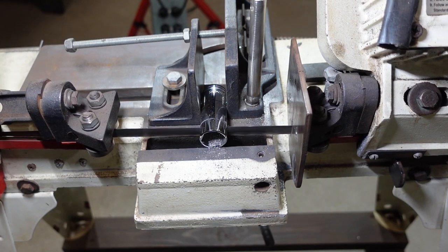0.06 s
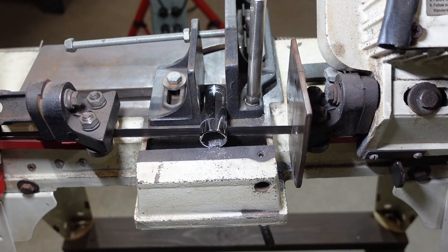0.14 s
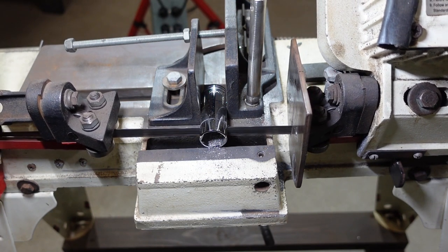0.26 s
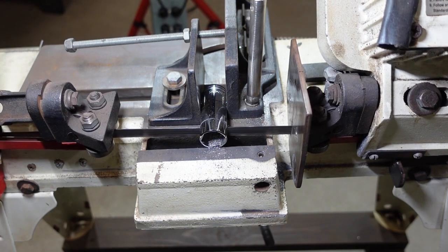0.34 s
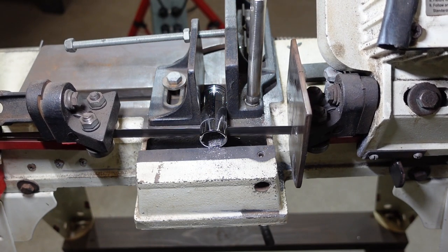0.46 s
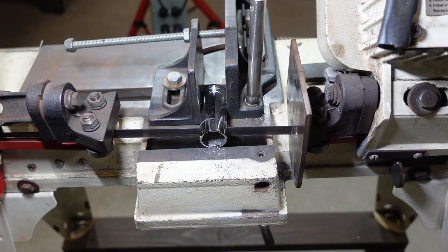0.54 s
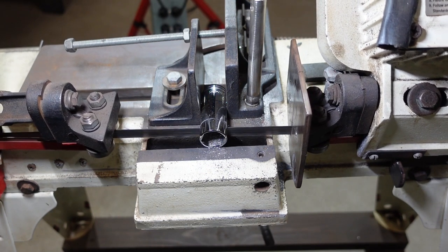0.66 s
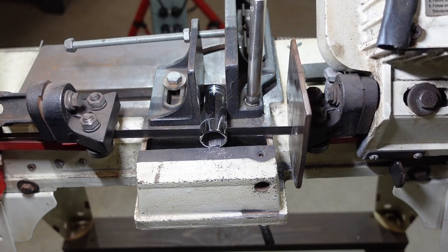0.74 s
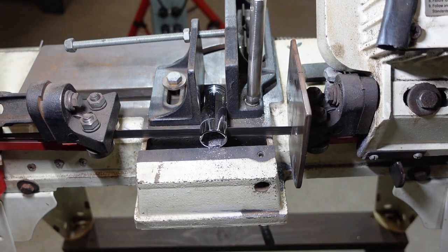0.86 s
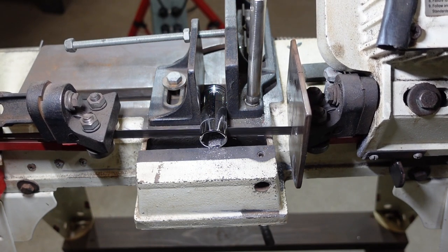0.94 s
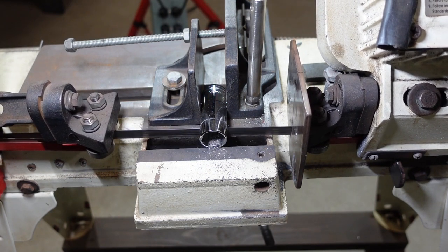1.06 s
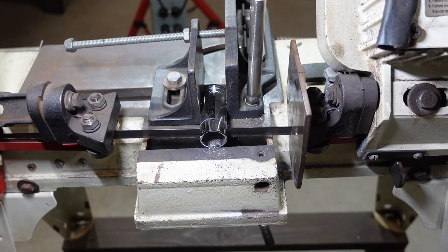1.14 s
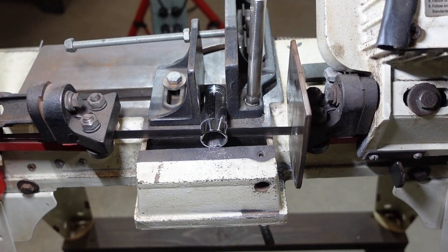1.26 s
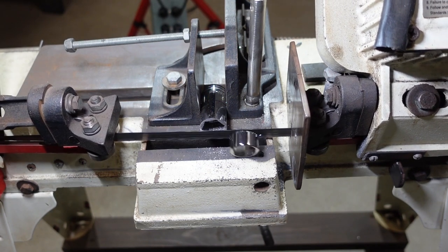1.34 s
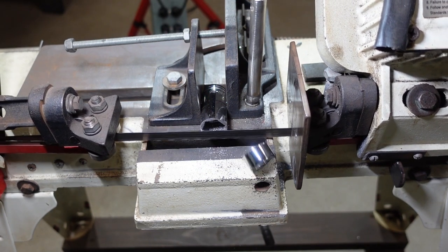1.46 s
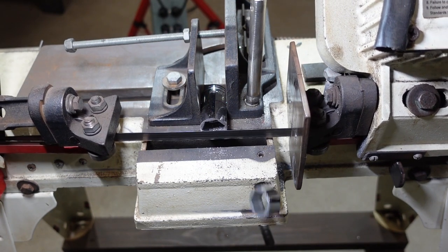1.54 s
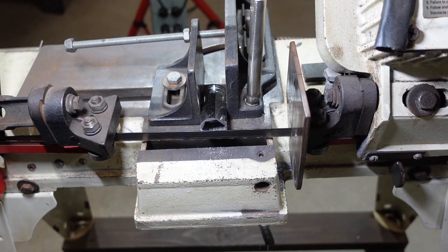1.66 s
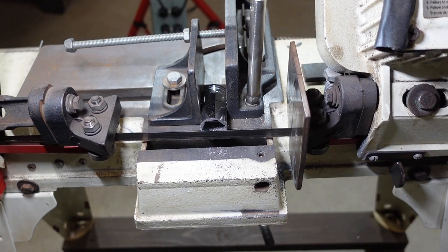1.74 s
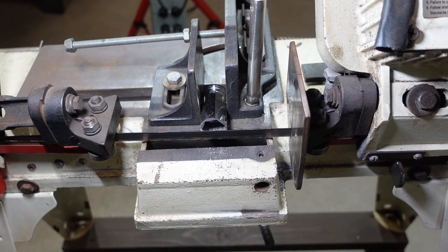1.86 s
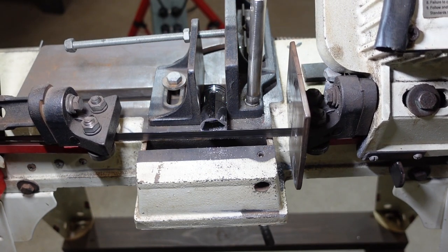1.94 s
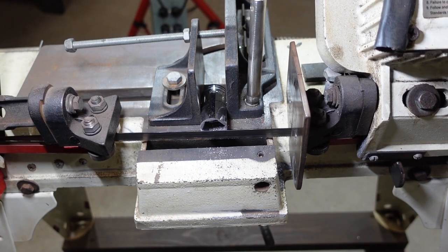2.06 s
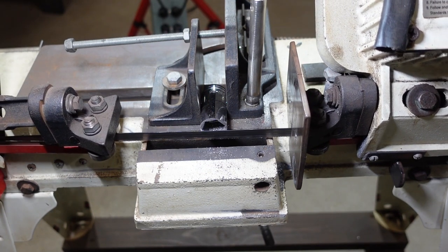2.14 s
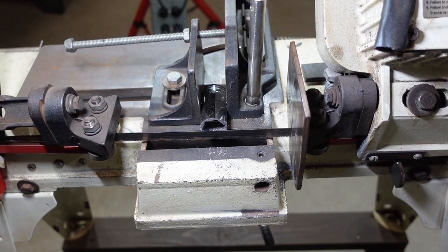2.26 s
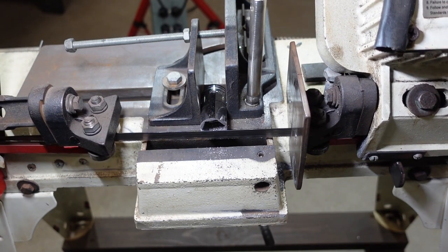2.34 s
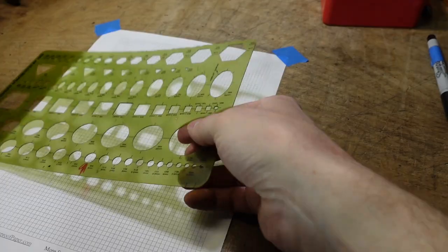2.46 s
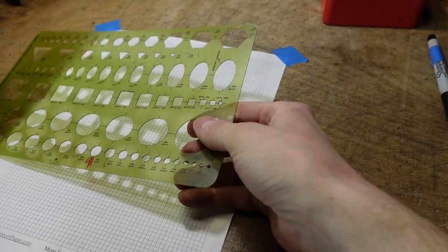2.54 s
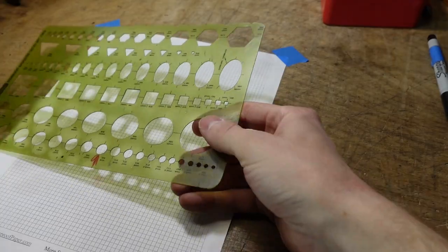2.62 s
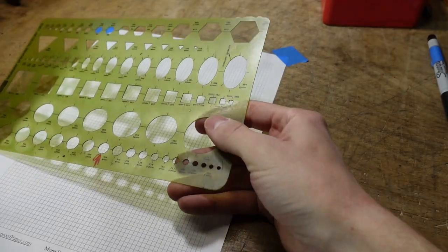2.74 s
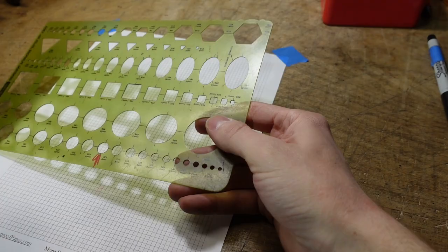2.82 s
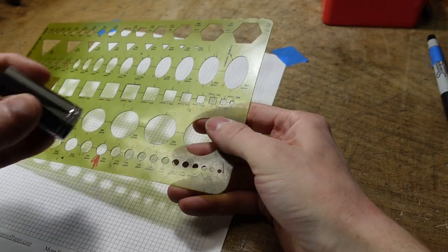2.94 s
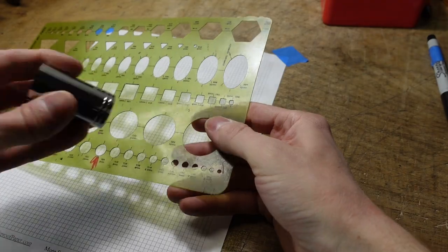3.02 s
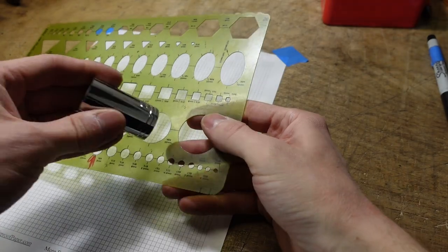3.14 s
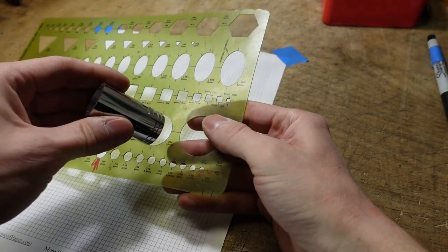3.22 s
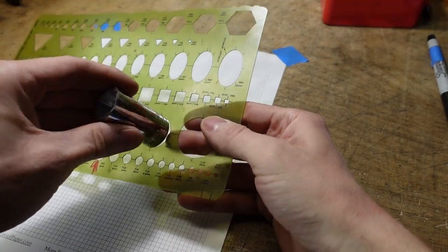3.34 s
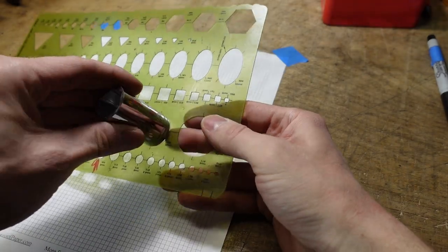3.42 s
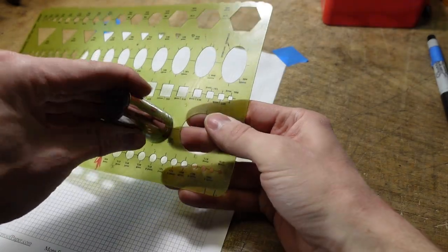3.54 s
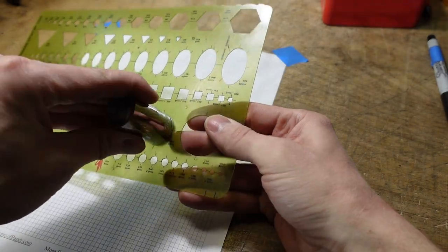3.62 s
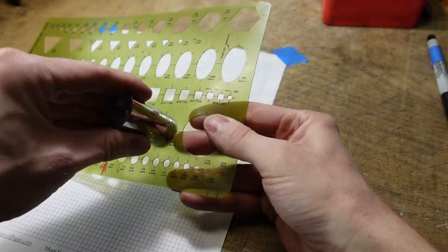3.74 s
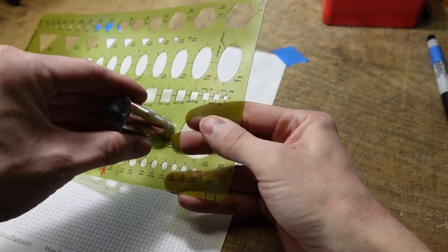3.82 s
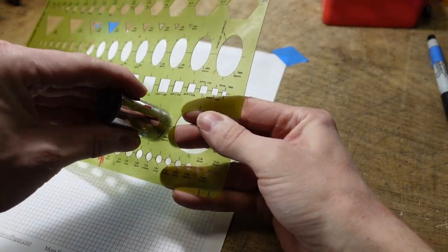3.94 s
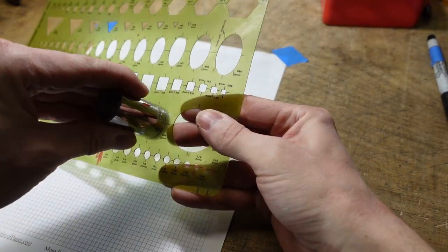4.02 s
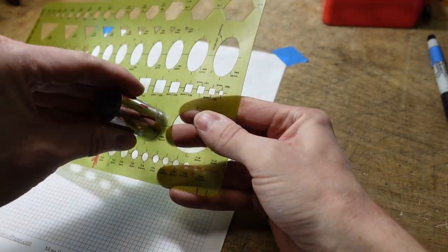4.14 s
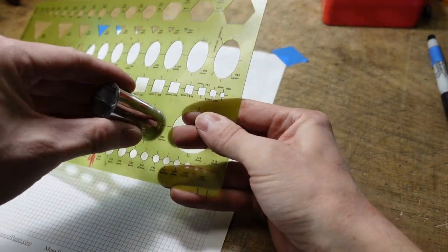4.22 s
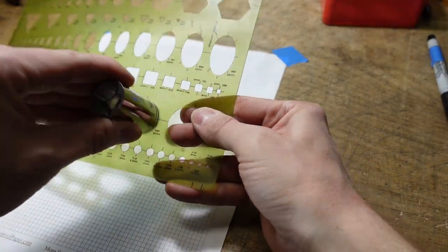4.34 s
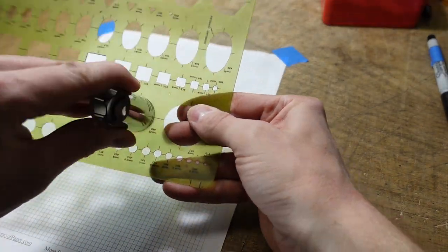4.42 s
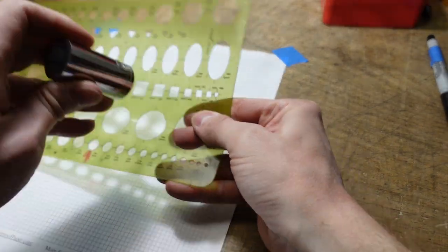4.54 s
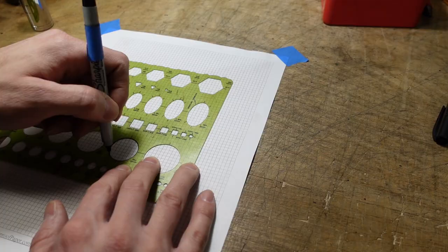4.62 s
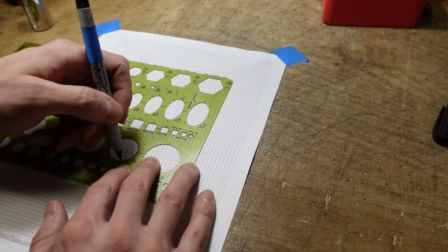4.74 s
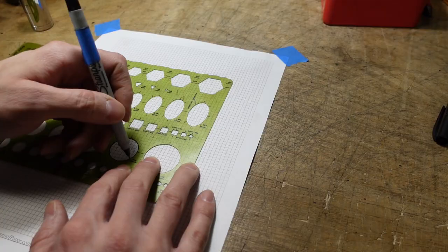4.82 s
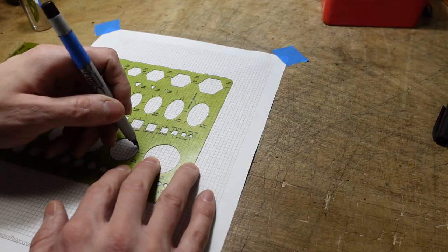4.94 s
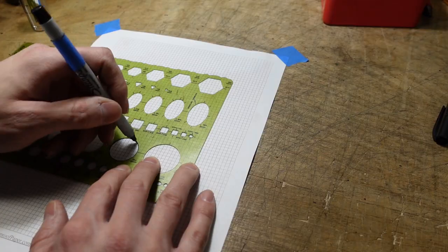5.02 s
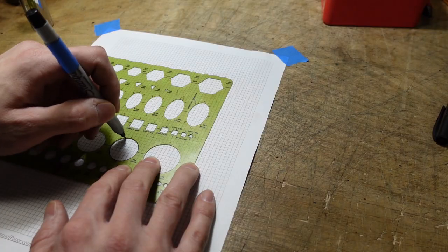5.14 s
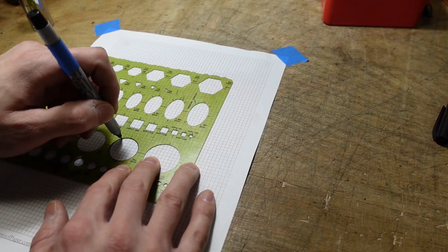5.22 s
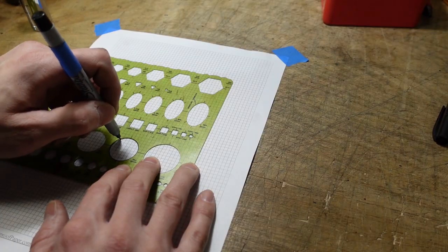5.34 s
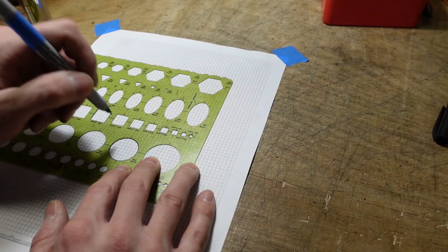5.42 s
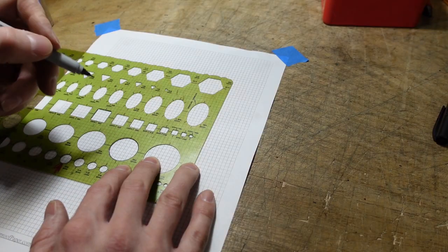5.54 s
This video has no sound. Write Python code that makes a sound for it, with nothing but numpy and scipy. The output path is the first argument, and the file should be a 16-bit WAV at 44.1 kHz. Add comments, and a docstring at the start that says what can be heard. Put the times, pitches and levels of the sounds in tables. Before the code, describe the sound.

A band saw whines through steel, the cut piece clatters and rings, then light plastic taps and a faint marker stroke follow.

```python
"""In a workshop, a band saw's teeth tear through a steel socket, first sped up, then at true speed.
The blade breaks through, the saw arm drops and the free blade rattles as it runs down. The cut end
hits the tray, then bounces twice on the floor, ringing like a bell as it spins. The scene changes to
a quiet desk: the socket taps a plastic stencil, the stencil is laid down, and a marker's felt tip
sticks and slips on the paper as it traces a circle."""
import sys
import numpy as np
from scipy import signal
from scipy.fft import rfft, irfft, next_fast_len
from scipy.io import wavfile
from scipy.ndimage import uniform_filter1d, minimum_filter1d

SR = 44100
rng = np.random.default_rng(int(sys.argv[2]) if len(sys.argv) > 2 else 0)


def transcribe(signal):
    """Save signal, clipped to [-1, 1], as a 16-bit WAV file at the path in sys.argv[1]."""
    frames = np.atleast_2d(signal).T
    limited = np.clip(frames, -1, 1)
    pcm = np.round(limited * 32767).astype(np.int16)
    wavfile.write(sys.argv[1], SR, pcm)


N = 246078
TIME, FREQS = np.arange(N) / SR, np.fft.rfftfreq(N, 1 / SR)
TRUE_SPEED_AT, DESK_AT, DRAWING_AT = 0.898, 2.468, 4.67  # s

# notes that blade and frame favour (f/Hz, width/Hz, boost/dB)
FRAME_MODES = [(240.74, 8.3, 7), (275.86, 14, 2), (353.73, 27, 5), (430.4, 40, 4.5), (885.82, 18, 10.5),
               (1081.8, 48, 8.5), (1428.8, 57, 7.5), (1915, 18, 7.5), (2207.7, 70, 6), (2576, 97, 4.5),
               (3891.1, 56, 7), (6378.6, 400, 5), (7115.8, 120, 5), (10415, 320, 6)]
# motor hum and gear whine (f/Hz at true speed, level/dB sped up, level/dB at true speed)
MOTOR_HUM = [(119.56, -46.5, -47.5), (149.85, -49.5, -53), (236.35, -45, -43.5), (481.15, -37, -36),
             (880.5, -38, -36), (1076.4, -41.5, -44.5), (1200.5, -50, -51), (2202.8, -37.5, -44.5)]
# tone colours of the saw and workshop, from bass to treble (f/Hz, relative level/dB)
FAST_CUT_COLOUR = [(60, -37.5), (200, -38.5), (330, -25.5), (520, -21), (620, -9.5), (900, -9),
                   (1450, -1.5), (2000, 0), (2700, -4), (3200, -5.5), (4000, -2), (7200, -1.5),
                   (10200, 1.5), (12500, -2), (16000, -4.5)]
CUT_COLOUR = [(29, -70.5), (50, -43), (108, -25.5), (189, -14.5), (229, -10), (428, -3.5), (678, -9),
              (884, -6), (1240, -8), (2270, -4), (3500, -7), (6390, -9), (8540, -16), (12000, -22.5),
              (16000, -42)]
CHIP_COLOUR = [(1500, -22.5), (2600, -3), (5000, -10), (8500, -3.5), (10400, 0.5), (11200, -1), (12000, 2),
               (12900, -9), (13600, -3.5), (16000, -13.5)]
BURR_COLOUR = [(100, -25), (260, 3), (650, -4.5), (1400, -2.5), (2200, 2), (3100, -1.5), (3900, 2.5),
               (4700, -12), (7200, -11), (14000, -34)]
ARM_COLOUR = [(40, -44), (100, -28), (170, -10), (260, 0.5), (370, -5), (490, -2.5), (700, -10.5),
              (1300, -9), (2500, -24.5), (8000, -55)]
FREE_BLADE_COLOUR = [(35, -59.5), (60, -29), (281, -4.5), (492, -6), (803, -11.5), (903, -9), (991, -12),
                     (2710, -15), (3500, -19.5), (4640, -14.5), (6280, -23), (9570, -23), (11000, -33),
                     (16000, -52)]
SHOP_AIR_COLOUR = [(30, -25.5), (70, -14), (140, -2), (260, 0), (700, -10), (2400, -12.5), (4500, -26.5),
                   (9000, -33), (16000, -55.5)]
# the blade squeaks and the gear whine swells briefly (t/s, length/s, f/Hz, level/dB)
SQUEAKS_AND_WHINE = [(.255, 0.07483, 3520, -25), (.275, 0.1195, 4900, -25.5), (.69, 0.1081, 3560, -22.5),
                     (0.758, 0.0667, 5670, -25), (1.048, .08, 2335, -21), (1.102, .05, 2670, -22.5),
                     (1.155, 0.17, 885, -23), (1.205, .08, 2290, -24)]
# teeth press on the socket's wall, then its rough edge (t/s, rise/s, hold/s, level/dB, fall/(dB/s))
TOOTH_CONTACTS = [(0.849, .01, 0.46524, -15, 649.5), (1.334, .07, .04, -19, 65.5)]
# lingering notes of the metal (f/Hz, level/dB, fade/s); a fade is the time to drop by 60 dB
METAL_NOTES = [(2430, -49, 2.8), (3294.2, -43, 1.2), (4578, -40, 0.9904), (2030.6, -60, 3)]
# the room's echo, before each set of hits scales its length (f/Hz, fade/s)
ECHO_FADES = [(200, 0.54), (1500, 0.39), (4000, 0.35), (8000, 0.5), (15000, 0.25)]
# the blade breaks through, the cut end rattles on tray and floor
# (t/s, level/dB, f/Hz, width/octaves, fade/s, relative echo/dB)
STEEL_KNOCKS = [(1.3334, -10, 3302, 1.022, 0.03423, -11), (1.3365, -11.5, 4496, 1.077, 0.0195, -12),
                (1.337, -14, 2451, 0.04594, 0.2125, -6.5), (1.387, -11, 2213, 0.6124, 0.0372, -9.5),
                (1.554, -19, 3358, 0.546, 0.05087, -4.5), (1.5955, -13.5, 5154, 0.715, 0.038, -5.5),
                (1.602, -6.5, 4658, 0.1796, 0.03016, -9.5), (1.6025, -15.5, 4527, 1.483, 0.01404, -2),
                (1.721, -32, 4403, 0.069, 0.11, -12.5), (1.815, -36.5, 4727, 0.04084, 0.2532, -6.5),
                (1.84, -37.5, 6480, 0.519, 0.1962, -2), (1.92, -39, 5514, 0.6705, 0.0306, -3.5),
                (2.371, -37, 2420, .04, .12, -8)]
# notes that the steel tray, cut end, stencil and air duct favour (f/Hz, width/Hz, boost/dB)
TRAY_MODES = [(4919, 300, 4.5), (7402.3, 480, 7), (13318, 900, 6)]
CUT_END_MODES = [(295.6, 310, 15), (3600, 2000, 3.5), (7283, 1500, -7), (9316.5, 1092.6, 18),
                 (15147, 3500, -16)]
STENCIL_MODES = [(1180, 84.2, 3), (1854.6, 219.7, 7.5), (3700, 411, 0.5), (4348, 1192, -1.5),
                 (5896.4, 546, 4.5), (9102.3, 790, 7), (10746, 1028, 5), (15170, 2990, -1)]
DUCT_MODES = [(183.81, 10.38, 7), (1146.2, 162.1, 7.5), (2904, 552, 0)]
# the blade brushes the loose end (t/s, rise/s, hold/s, level/dB, fall/(dB/s))
BLADE_BRUSHES = [(1.344, .025, 0.00887, -22, 169.5), (1.548, 0.015088, 0.01215, -27, 135.5)]
# the struck cut end rings on (f/Hz, width/Hz, level/dB, fade/s)
CUT_END_NOTES = [(4850, 260, -31, .28), (7201, 380, -31.5, .33), (13110, 300, -38, .35)]
# the cut end hits the floor (t/s, level/dB, f/Hz, width/octaves, fade/s, relative echo/dB, spin/Hz)
FLOOR_BOUNCES = [(1.9688, -4.5, 3700, 1.2165, 0.0053, -3, 92),
                 (2.3697, -13, 3221, 1.3452, 0.00432, 5.5, 55.24)]
# its ring as it turns its mouth to and from the listener (t/s, level/dB)
TUMBLE_LEVELS = [(1.969, -14.5), (2.02, -9.5), (2.09, -10.5), (2.136, -11), (2.156, -23.5), (2.22, -18.5),
                 (2.244, -14.5), (2.268, -19.5), (2.365, -21), (2.392, -14.5), (2.41, -14), (2.43, -22),
                 (2.456, -12.5)]
# tone colours of the air at the desk, the air while drawing and the felt tip (f/Hz, relative level/dB)
DESK_AIR_COLOUR = [(15, -71.5), (25, -42.5), (55, -23.5), (127, -12.5), (175, -5), (217, -6.5),
                   (354, -11.5), (531, -16.5), (641, -17.5), (1130, -21), (1330, -24), (2840, -19),
                   (3620, -26.5), (14400, -35), (16000, -27.5)]
DRAWING_AIR_COLOUR = [(15, -74), (25, -41), (70, -27.5), (123, -23.5), (153, -3.5), (185, -13.5), (249, -1),
                      (363, -9.5), (659, -14.5), (818, -20.5), (1480, -18), (2000, -21.5), (3920, -22),
                      (16000, -41)]
FELT_COLOUR = [(300, -19.5), (1100, -5), (2100, 2), (2700, -9), (4200, -14.5), (5100, -8.5), (6600, -16.5),
               (9500, -14), (11200, -18), (12200, -6), (12900, -2), (14000, -14), (16000, -23)]
# the stencil slides; last, the marker's hiss swells (t/s, length/s, level/dB, f/Hz, width/octaves)
DESK_SLIDES = [(2.399, 0.30622, -53, 6952, 2.161), (2.707, 0.07034, -59.5, 12030, 1.009),
               (3.209, 0.07693, -68.5, 10970, 0.3182), (3.925, 0.1314, -60.5, 3484, 1.541),
               (4.143, 0.1313, -73, 4994, 1.17), (4.544, 0.12274, -52, 7971, 0.686),
               (5.071, 0.1866, -65, 12490, 0.675)]
# the stencil groans as it bends (t/s, length/s, f/Hz, level/dB)
STENCIL_GROANS = [(2.462, 0.056, 702, -47.5), (2.518, 0.05971, 688, -43.5), (4.567, 0.07512, 774, -51.5)]
# socket and stencil tap; last, the marker's tip ticks on the paper
# (t/s, level/dB, f/Hz, width/octaves, fade/s, relative echo/dB)
DESK_TAPS = [(2.5445, -56.5, 7000, 1.1, .012, -7.5), (2.548, -25, 8610, 1.5864, 0.021994, -23.5),
             (3.322, -45.5, 6002, 1.2, 0.00803, -9.5), (3.6645, -25, 1883, 1.5812, 0.015907, -14.5),
             (3.665, -28, 3653, 0.2085, 0.013426, -12.5), (4.2708, -42.5, 4521, 1.1413, 0.01986, -16),
             (4.5725, -18.5, 2800, 1.8054, 0.01589, -15.5), (4.573, -42, 398.4, 0.591, 0.04092, -6.5),
             (4.6098, -28, 4721, 2.32, 0.03049, -12.5), (4.639, -44, 5930, 2.4, 0.03985, -7),
             (4.859, -49.5, 12870, .14, 0.02497, -12.5)]
# the marker lands firmly, catches once, glides lightly (t/s, rise/s, hold/s, level/dB, fall/(dB/s))
MARKER_STROKES = [(4.682, .015, 0.12707, -53, 260), (4.855, 0.00385, 0.00834, -55, 1000),
                  (4.84, 0.0539, 0.0752, -65.5, 34)]


def amp(db):
    """Turns decibels into a number to multiply by."""
    return 10 ** (np.asarray(db) / 20)


def evened(x):
    """Scales x to an average strength (rms) of 1."""
    return x / np.sqrt(np.mean(abs(x) ** 2) + 1e-20)


def curve(points, hz=FREQS):
    """Joins the points of a table along a pitch scale."""
    f, value = np.transpose(points)
    return np.interp(np.log(hz + 1), np.log(f + 1), value)


def between(start, end):
    """1 from start to end, 0 outside."""
    return uniform_filter1d(((TIME >= start) & (TIME < end)) * 1., size=8)


def since(start):
    """Seconds gone by since start, 0 before it."""
    return np.maximum(TIME - start, 0)


def envelope(start, rise, hold, db, fall_db_per_s):
    """A level that rises, holds and dies away."""
    return np.clip((TIME - start) / rise, 0, 1) * amp(db - fall_db_per_s * since(start + rise + hold))


def add(mix, start, sound):
    """Mixes a sound in at start seconds."""
    part = mix[max(round(start * SR), 0):][:len(sound)]
    part += sound[:len(part)]


def add_swell(mix, start, length, db, sound):
    """Mixes in a short piece of a sound, fading it in and out."""
    swell = np.hanning(int(length * SR))
    add(mix, start, amp(db) * swell * evened(sound[:len(swell)]))


def wander(hz):
    """A random wobble of strength 1, up to about hz times a second."""
    slow_rate = 3000
    count = next_fast_len(int(N / SR * slow_rate) + 2)
    smoothing = np.exp(-(np.fft.rfftfreq(count, 1 / slow_rate) / hz) ** 2)
    slow = irfft(rfft(rng.standard_normal(count)) * smoothing, count)
    return np.interp(TIME, np.arange(count) / slow_rate, evened(slow))


def coloured(x, db):
    """Gives x the tone colour db, at strength 1."""
    return evened(irfft(rfft(x) * amp(db), N))


def peaks(modes, hz=FREQS):
    """Humps, in dB, at the notes an object favours."""
    return sum(db / (1 + (2 * (hz - f) / width) ** 2) for f, width, db in modes)


def grains(per_s, spread_db):
    """Random clicks of uneven size."""
    size = amp(spread_db * np.minimum(rng.exponential(1, N), 4))
    return evened(size * rng.standard_normal(N) * (rng.random(N) < per_s / SR))


def band(x, hz, octaves, body):
    """Keeps the part of x around hz and adds the colour of an object's body."""
    freqs = abs(np.fft.fftfreq(4096, 1 / SR))
    away = np.log2((freqs + 1) / hz) / octaves
    log_gain = -5 * np.log1p(away ** 2 / 8) + np.log(amp(peaks(body, freqs)))
    # this keeps the filter from ringing before the sound arrives
    response = np.exp(np.conj(signal.hilbert(np.maximum(log_gain, -10))))
    ring = np.fft.ifft(response).real
    return signal.fftconvolve(x, ring[:len(ring) // 2] / np.linalg.norm(ring))[:len(x)]


def tone(hz, waver, flutter):
    """A note that wavers in pitch and flutters in strength."""
    angle = 2 * np.pi * np.cumsum(hz * (1 + waver * wander(8.7))) / SR
    return np.sqrt(2) * np.sin(angle) * (1 + flutter * wander(6.1))


def whistle(hz, width_hz):
    """A fuzzy note of strength 1 that follows hz."""
    angle = 2 * np.pi * np.cumsum(hz * np.ones(N)) / SR
    return np.cos(angle) * wander(width_hz) + np.sin(angle) * wander(width_hz)


def cutting(speed, colour, chatter_db, ripple_db, resonance):
    """Teeth tear chips in uneven bites and shake blade and frame, whose notes rise with speed."""
    chips = grains(22000 * speed, spread_db=0.9334)
    chatter = amp(chatter_db * wander(70 * speed) + .5 * wander(9 * speed))
    small_modes = evened(uniform_filter1d(rng.standard_normal(len(FREQS)), size=90 * speed))
    frame_db = resonance * peaks(FRAME_MODES, FREQS / speed) + ripple_db * small_modes
    return coloured(chips * chatter, curve(colour) + frame_db)


def squeal(hz, width_hz, stutter_db):
    """The rubbed blade sings as it grips and lets go."""
    return amp(stutter_db * wander(36)) * whistle(hz, width_hz)


def fast_saw(speed=4):
    """The sped-up saw: one blade note wanders as it flexes, another sinks as the cut deepens."""
    cut = amp(-16) * cutting(speed, FAST_CUT_COLOUR, chatter_db=1.2374, ripple_db=1.9439, resonance=.7)
    hum = sum(amp(db) * tone(hz * speed, waver=0.000697, flutter=0.3178) for hz, db, _ in MOTOR_HUM)
    shriek_hz = 10000 * (1 + .05 * wander(90))
    shriek = amp(-28 + 2.859 * wander(58)) * whistle(shriek_hz, width_hz=281)
    sinking = amp(-33) * squeal(5800 - 2950 * TIME, width_hz=403.2, stutter_db=2)
    return cut + hum + shriek + sinking


def squeaks_and_whine():
    """The blade squeaks and the gear whine swells briefly."""
    out = np.zeros(N)
    for start, length, hz, db in SQUEAKS_AND_WHINE:
        note = tone(hz, waver=.004, flutter=.15) + .6 * whistle(hz, width_hz=70)
        add_swell(out, start, length, db, note)
    return out


def true_speed_saw():
    """The teeth cut the last of the wall while the motor hums and the blade sings in its slot."""
    wall, edge = (envelope(*row) for row in TOOTH_CONTACTS)
    pressure = wall + edge
    cut = pressure * cutting(1, CUT_COLOUR, chatter_db=0.957, ripple_db=2, resonance=1)
    hum = sum(amp(db) * tone(hz, waver=.002, flutter=0.14) for hz, _, db in MOTOR_HUM)
    singing = amp(-29.5) * squeal(2416.2 * (1 + .055 * wander(14)), width_hz=70, stutter_db=3)
    return cut + hum * pressure / pressure.max() + (snapping_chips() + singing) * wall / wall.max()


def snapping_chips():
    """A fine spray of chips, with a spurt at each pass of the tallest tooth."""
    bite_hz, first_bite_at, bite_s = 50.2, 0.909, .0028
    from_bite = (((TIME - first_bite_at) * bite_hz + .5) % 1 - .5) / bite_hz
    depth_db = 4.5 * np.clip(wander(40), -2, 1) - 60 * since(1.17)  # weaker as the wall thins
    spurts = np.exp(-(from_bite / bite_s) ** 2) * amp(-24.5 + depth_db)
    return (amp(-29.5) + spurts) * coloured(grains(20000, spread_db=1.8386), curve(CHIP_COLOUR))


def ringing_metal():
    """Metal rings through the cut and fades away after it."""
    return sum(amp(db - 60 * since(1.6) / fade) * tone(hz, waver=.002, flutter=.3)
               for hz, db, fade in METAL_NOTES)


def shop_air():
    """The soft, steady rush of the workshop."""
    return amp(-59) * coloured(rng.standard_normal(N), curve(SHOP_AIR_COLOUR))


def burr_rasp():
    """The teeth rasp over the burr, the rough edge of the cut."""
    level = envelope(1.201, rise=0.0426, hold=0.0859, db=-19.5, fall_db_per_s=130.5)
    scratches = grains(9000, spread_db=0) * amp(1.4 * wander(60))
    return level * coloured(scratches, curve(BURR_COLOUR))


def hits(rows, body, crack, echo_scale):
    """Each hit is a sharp crack and a dying rattle of the struck body, answered by the room."""
    direct, to_room, t = np.zeros(N), np.zeros(N), TIME[:SR // 3]
    for start, db, hz, octaves, fade, echo_db, *_ in rows:
        decay = amp(-60 * t / fade)
        size = amp(db) * np.linalg.norm(decay)
        click = band(signal.unit_impulse(len(t)), hz, octaves, body)
        rattle = signal.fftconvolve(click, rng.standard_normal(len(t)) * decay)[:len(t)]
        hit = crack * click + rattle
        add(direct, start, size * hit / np.linalg.norm(hit))
        add(to_room, start, size * amp(echo_db) * click)
    return direct + room_echo(to_room, echo_scale)


def room_echo(x, length_scale):
    """A smooth wash of echoes whose highest treble dies first."""
    hz, t, noise = signal.stft(rng.standard_normal(SR), SR, nperseg=256)
    fades = length_scale * curve(ECHO_FADES, hz)
    tail = signal.istft(noise * amp(-60 * t / fades[:, None]), SR, nperseg=256)[1]
    tail *= np.minimum(np.arange(len(tail)) / SR / 0.003961, 1)
    return signal.fftconvolve(x, tail / np.linalg.norm(tail))[:N]


def socket_ring():
    """The cut end sings when the blade brushes it and at each bounce; spin and echoes make it throb."""
    bell_hz, settled_hz, settle_s = 9230, 27.373, 0.1697
    brushes = [envelope(*row) for row in BLADE_BRUSHES]
    tumble = amp(np.interp(TIME, *np.transpose(TUMBLE_LEVELS)))
    level = np.where(TIME < FLOOR_BOUNCES[0][0], sum(brushes), tumble)
    spin_hz = np.full(N, FLOOR_BOUNCES[0][-1])
    for start, *_, kick_hz in FLOOR_BOUNCES:
        slowing_hz = settled_hz + (kick_hz - settled_hz) * np.exp(-since(start) / settle_s)
        spin_hz = np.where(TIME < start, spin_hz, slowing_hz)
    spin = 0.73 * np.exp(2j * np.pi * np.cumsum(spin_hz) / SR)
    echoes = .55 * (wander(50) + 1j * wander(50))
    throb = 1 + spin + echoes
    throb /= np.sqrt(uniform_filter1d(abs(throb) ** 2, size=2000))  # evens out slow swells
    bell = np.sqrt(2) * (throb * np.exp(2j * np.pi * bell_hz * TIME)).real
    overtone_level = amp(-14 - 150 * since(BLADE_BRUSHES[0][0])) * brushes[0]
    return level * bell + overtone_level * whistle(13570, width_hz=25)


def arm_drop():
    """The saw arm shudders down onto its stop with a boom."""
    level = envelope(1.385, rise=0.045, hold=0.085, db=-19.5, fall_db_per_s=175)
    return level * coloured(grains(1500, spread_db=1), curve(ARM_COLOUR))


def blade_scrape():
    """The blade's side scrapes the fresh cut."""
    level = envelope(1.41, rise=0.031, hold=0.12, db=-32.5, fall_db_per_s=401)
    return level * squeal(10113 * (1 + 0.0081 * wander(20)), width_hz=75, stutter_db=2.1213)


def coasting():
    """The free blade rattles as it runs down."""
    level = envelope(1.4923, rise=0.0549, hold=0.27, db=-33, fall_db_per_s=62)
    rattle = grains(8000, spread_db=0.8) * amp(1.2 * wander(43))
    return level * coloured(rattle, curve(FREE_BLADE_COLOUR))


def cut_end_clink():
    """The cut end rings on after it lands in the tray."""
    return sum(envelope(1.603, rise=.012, hold=0, db=db, fall_db_per_s=60 / fade) * whistle(hz, width)
               for hz, width, db, fade in CUT_END_NOTES)


def floor_bounces():
    """Steel clacks on concrete, and each bounce shakes the cut end's body."""
    clack = (3750, .7, .0045, -14)  # f/Hz, width/octaves, fade/s, relative echo/dB
    rows = [(start, db - 1) + clack for start, db, *_ in FLOOR_BOUNCES]
    clacks = hits(rows, body=(), crack=10.62, echo_scale=0.9897)
    return clacks + hits(FLOOR_BOUNCES, CUT_END_MODES, crack=4.7, echo_scale=1.0904)


def ventilation():
    """Air hums softly in a duct; the tone colour changes as the drawing starts."""
    early = amp(-60) * coloured(rng.standard_normal(N), curve(DESK_AIR_COLOUR) + peaks(DUCT_MODES))
    late = amp(-61) * coloured(rng.standard_normal(N), curve(DRAWING_AIR_COLOUR))
    return np.where(TIME < DRAWING_AT, early, late)


def slides_and_groans():
    """The stencil slides and bends, and the marker's hiss swells on the paper."""
    out = np.zeros(N)
    for start, length, db, hz, octaves in DESK_SLIDES:
        rub = band(grains(18000, spread_db=-5.5), hz, octaves, STENCIL_MODES)
        add_swell(out, start, length, db, rub)
    for start, length, hz, db in STENCIL_GROANS:
        groan = tone(hz, waver=0.01852, flutter=0.0973) + 0.517 * whistle(hz, width_hz=248.5)
        add_swell(out, start, length, db, groan)
    return out


def marker():
    """The felt tip sticks and slips on paper; the barrel's note sinks as the hand goes round."""
    rasp = amp(-3) * coloured(grains(15000, spread_db=2.5), curve(FELT_COLOUR))
    barrel = amp(-3) * whistle(1784.7 - 520 * (TIME - DRAWING_AT), width_hz=242.4)
    pressure = sum(envelope(*row) for row in MARKER_STROKES)
    return pressure * amp(1.6 * wander(50.3)) * (rasp + barrel)


def scene():
    """Sped-up saw, true-speed saw and desk follow each other abruptly, the same in both ears."""
    opening = fast_saw() * between(0, TRUE_SPEED_AT) + squeaks_and_whine()
    shop = true_speed_saw() + ringing_metal() + shop_air() + burr_rasp()
    shop += hits(STEEL_KNOCKS, TRAY_MODES, crack=3.5, echo_scale=1.4) + socket_ring()
    shop += arm_drop() + blade_scrape() + coasting() + cut_end_clink() + floor_bounces()
    desk = ventilation() + slides_and_groans()
    desk += hits(DESK_TAPS, STENCIL_MODES, crack=4.627, echo_scale=0.3623) + marker()
    mono = opening + shop * between(TRUE_SPEED_AT, DESK_AT) + desk * between(DESK_AT, np.inf)
    return np.array([mono, mono])


def record(dry):
    """Turns the loudest peaks down for a moment, then removes the very highest treble."""
    ceiling, top_hz = .8, 16150
    needed_gain = ceiling / np.maximum(abs(dry).max(0), ceiling)
    held = dry * uniform_filter1d(minimum_filter1d(needed_gain, size=64), size=64)
    treble_cut = signal.firwin(511, top_hz, window=("kaiser", 9), fs=SR)
    return signal.oaconvolve(held, treble_cut[None], "same")


dry = scene()
out = record(dry)
transcribe(out)
```